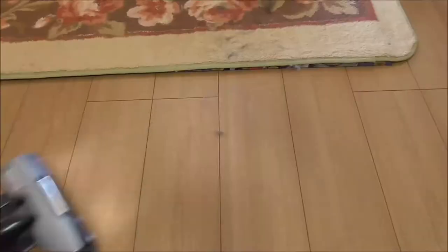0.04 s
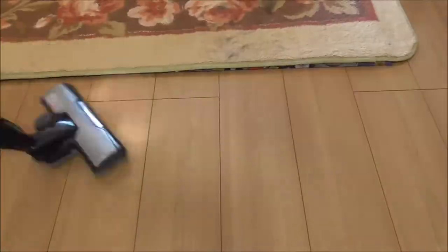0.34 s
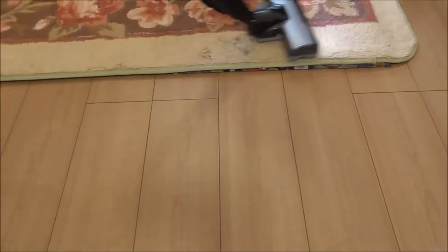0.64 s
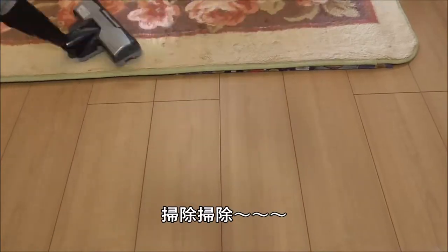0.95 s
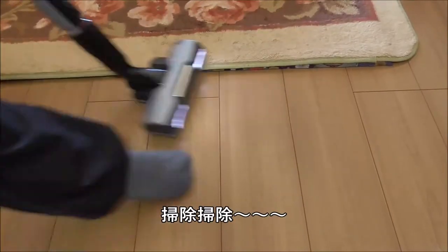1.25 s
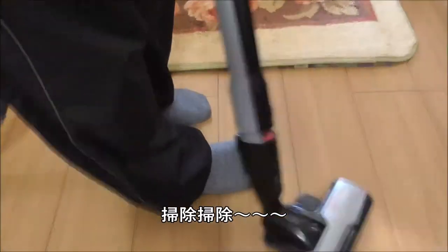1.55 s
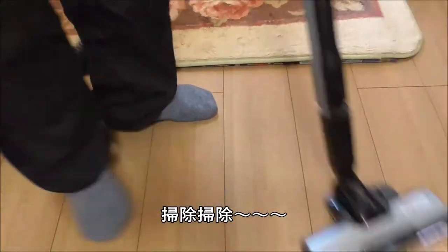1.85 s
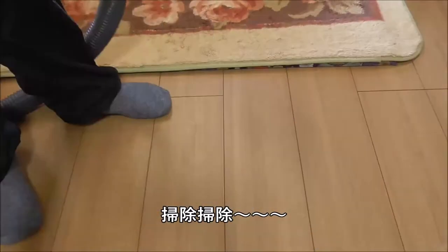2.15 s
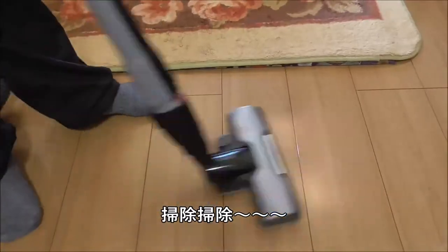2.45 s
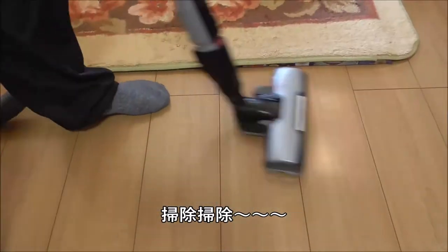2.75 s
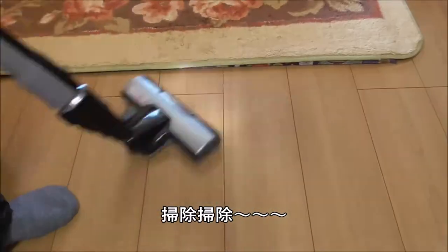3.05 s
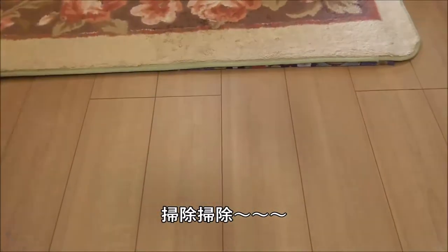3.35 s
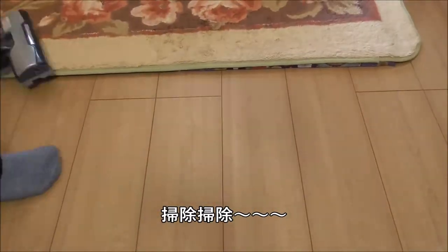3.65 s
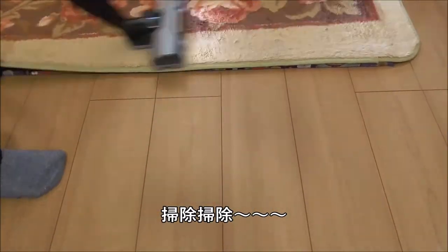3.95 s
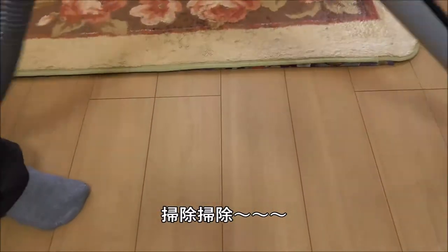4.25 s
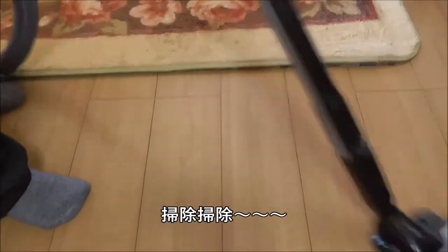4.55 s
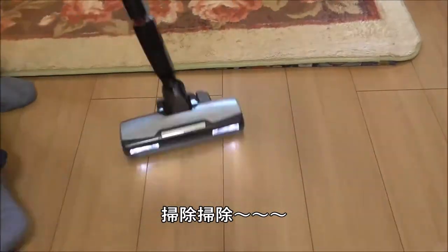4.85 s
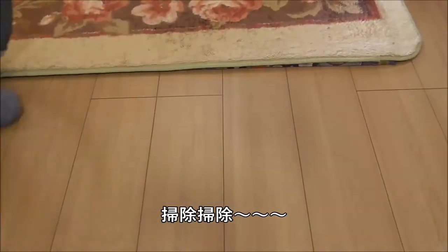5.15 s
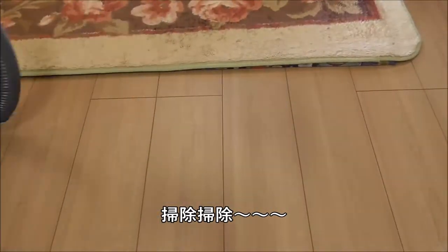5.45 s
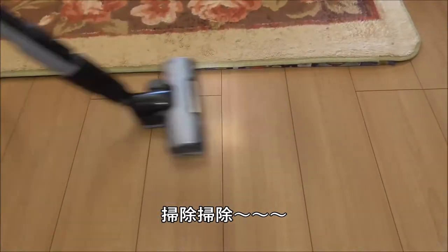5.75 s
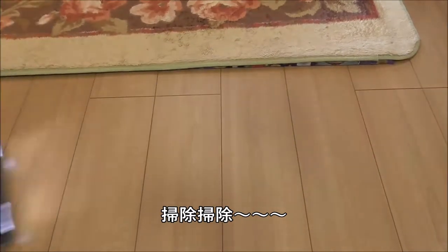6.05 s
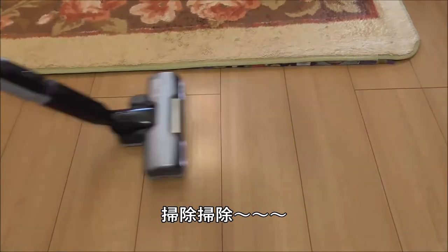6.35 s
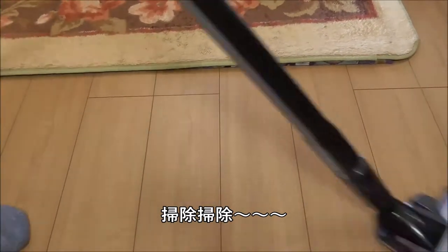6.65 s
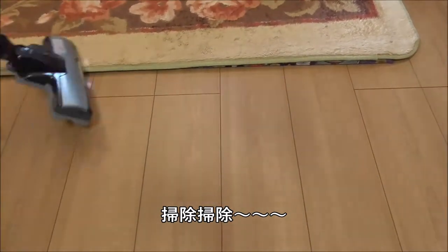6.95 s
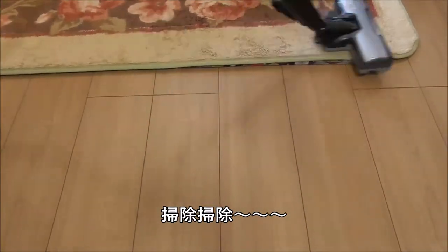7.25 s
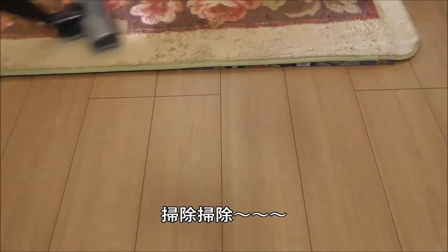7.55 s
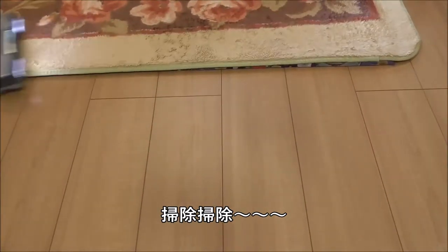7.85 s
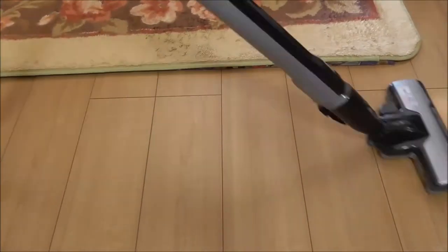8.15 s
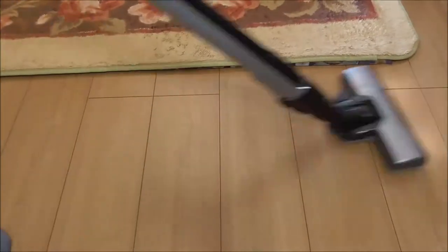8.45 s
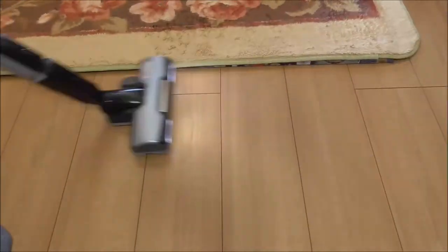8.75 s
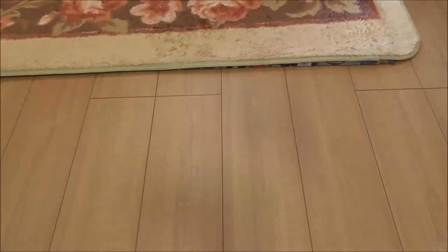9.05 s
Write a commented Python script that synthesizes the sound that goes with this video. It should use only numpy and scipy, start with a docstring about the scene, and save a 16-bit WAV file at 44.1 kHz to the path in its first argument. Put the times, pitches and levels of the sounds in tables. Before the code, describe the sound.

A canister vacuum cleaner cuts in abruptly right at the start, already running, close by in a small room. Its motor holds a steady hum and a high whine while air rushes through the tube and hisses at the nozzle. The plastic head moves to and fro over wooden boards, each stroke swelling the hiss and rolling rumble, with short scrapes, faint whistles and ticks of grit. Knocks come often in the first two seconds, with sharp snaps of the swivel joint at about 1 and 1.5 seconds, then scattered bumps around 2.4, 4.2, 5.6, 6.1 and from 7 to 8.3 seconds. A rug slightly muffles the hiss and rumble from 0.4 to 1.2, 3.6 to 4.1 and 7 to 8 seconds. At 9 seconds the motor is switched off: the hum stops, the whine falls and the air fades, with a few light taps.

```python
"""In a small room, a canister vacuum cleaner is pushed to and fro over a wooden floor and a rug's edge.
The motor hums and whines, and air rushes through the tube, hisses at the nozzle and whistles in gaps.
The plastic floor head rumbles, scrapes, knocks and sucks up grit, all close by. Strokes swell the hiss
and rumble; the rug muffles them. Near the end the motor is switched off and runs down."""
import sys
import numpy as np
from scipy import signal
from scipy.fft import rfft, irfft, next_fast_len
from scipy.io import wavfile
from scipy.ndimage import uniform_filter1d

SR = 44100
rng = np.random.default_rng(int(sys.argv[2]) if len(sys.argv) > 2 else 0)


def digitize_waveform(pressure):
    """Quantize a signal to 16-bit integers and store it at the path in sys.argv[1].

    Rows of a 2-D input are taken as channels; values are limited to [-1, 1].
    """
    field = np.atleast_2d(pressure).T
    bounded = np.clip(field, -1, 1)
    quanta = np.round(bounded * 32767).astype(np.int16)
    wavfile.write(sys.argv[1], SR, quanta)


N = 409688
T = np.arange(N) / SR
FFT_SIZE = next_fast_len(N + 8192)
FREQ = np.maximum(np.arange(FFT_SIZE // 2 + 1) * SR / FFT_SIZE, 1)
START_S, OFF_S = .0625, 9.01  # the running cleaner cuts in abruptly at START_S; switched off at OFF_S

# The tone colour of each noise. Each row: frequency in Hz, relative level in dB.
ROOM_COLOUR = [(30, -17), (120, -26), (230, -16.5), (500, -2), (1200, -1.5), (3000, -15), (8000, -11.5),
               (15000, -12.5)]
CRACK_COLOUR = [(150, -70), (1000, -35), (4000, -12), (6500, -1), (10000, -7), (16000, 3)]
GRIT_COLOUR = [(1000, -25), (4000, -7), (9000, -1), (16000, 3)]
TICK_COLOUR = [(100, -60), (300, -42), (700, -24), (1500, 0), (4000, 19), (6500, 1.5), (9000, 3),
               (16000, -23)]
RUSH_COLOUR = [(30, -31), (130, -24.5), (210, -27), (290, -17), (360, -15), (430, 2), (520, -29),
               (760, -4.5), (950, -1), (1600, 2), (2150, -4), (2700, 1), (3600, -8), (9000, -46)]
HISS_COLOUR = [(200, -61), (800, -57), (1800, 0.5), (2600, -2), (3400, 3.5), (4200, 1.5), (5400, -0.5),
               (6200, -14.5), (7100, -39), (13000, -41)]
SPRAY_COLOUR = [(300, -45), (3000, -16), (6000, 7), (7000, -1), (8200, 1), (9600, -2), (11000, -3.5),
                (13000, -3.5), (15800, -4.5)]
# How wide the sound spreads. Each row: frequency in Hz, gain of the side signal in dB.
STEREO_WIDTH = [(50, -19), (150, -8), (270, -14.5), (400, -17), (700, -13.5), (1290, -14), (2380, -7.5),
                (4400, -7), (8120, -7.5), (15000, -5)]

# The ways each part likes to ring. Each row: pitch in Hz, width in Hz, relative level in dB.
TUBE_MODES = [(921, 115, 4.5), (1035, 26, 2), (1223, 37, 7), (1345, 35, 5.5), (1540, 200, -1.5),
              (2000, 66, 3.5), (2280, 54, 4), (3040, 120, -11), (3717, 72, 7.5)]  # the air in the tube and hose
BOARD_MODES = [(263.6, 35.2, -1.5), (310.2, 24.3, 2)]  # the floorboards
SHELL_MODES = [(402, 33, -2.5), (567, 53.5, -1.5), (620.5, 106, -4), (691.3, 31.4, 1)]  # the head's shell as it rolls
CAVITY_MODES = [(387, 83, 0.5), (533, 180, 1.5), (662, 128, 6)]  # the head's hollow when bumped
COVER_MODES = [(970, 110, 3), (1410, 380, -1.5)]  # the head's cover when bumped
CLACK_MODES = [(1720, 93, 13), (2310, 710, 4.5), (3460, 1570, 3.5), (5060, 1300, -5)]  # the plastic when hit hard

# The motor's hum. Each row: time in seconds, level in dB.
HUM_LEVELS = [(0.08, -55.5), (0.43, -62), (1.39, -63.5), (1.49, -71), (1.54, -55), (4.67, -55.5),
              (4.81, -53), (5.68, -56), (6.3, -55), (6.35, -60), (8.04, -63), (8.14, -56.5), (8.83, -63.5),
              (8.98, -57.5)]
# The tones in the hum. Each row: multiple of the hum's pitch, relative level in dB.
HUM_HARMONICS = [(1, 0), (2, -14.5), (3, -14.5), (4, -12), (5, -13.5), (6, -19.5)]
# A motor whine near 2.6 kHz that drifts in pitch and level while the power is on.
# Each row: time in seconds, pitch in Hz, level in dB.
MOTOR_WHINE = [(.56, 2606, -65), (.66, 2626, -54), (1.22, 2650, -57.5), (1.3, 2640, -68), (1.8, 2656, -61),
               (2.2, 2670, -61), (2.7, 2646, -59), (2.76, 2640, -59), (3.15, 2634, -50.5), (3.5, 2625, -55),
               (3.73, 2670, -65), (3.92, 2645, -55.5), (4.25, 2637, -56), (4.7, 2633, -54.5),
               (5.65, 2626, -52.5), (6.05, 2634, -56.5), (6.25, 2641, -54), (6.55, 2641, -53.5),
               (6.95, 2647, -56), (7.08, 2665, -69), (7.62, 2685, -69), (7.79, 2640, -56),
               (7.84, 2655, -70), (7.89, 2650, -52.5), (8.0, 2660, -66), (8.2, 2655, -60),
               (8.3, 2654, -56.5), (8.45, 2640, -53.5), (8.82, 2642, -58), (9.0, 2650, -54)]
# Grit and joints tick. Each row: start in seconds, click level in dB, crack level in dB.
TICKS = [(0.4486, -48, -43), (0.497, -47.5, -53), (0.5544, -47, -47), (0.5647, -44, -55),
         (0.817, -46.5, -45), (0.929, -51, -52), (1.0322, -54, -52), (1.216, -48, -52), (1.236, -51, -58),
         (1.5286, -45, -49), (1.753, -48, -47), (2.436, -45, -54), (2.45, -49, -56), (3.5605, -53, -50),
         (3.701, -45, -45), (3.712, -53, -53), (3.721, -49, -51), (4.1486, -50, -53), (4.5236, -45, -48),
         (6.9726, -46, -53), (6.984, -52, -57), (7.085, -49, -48), (7.0904, -47, -50), (7.7765, -52, -57),
         (7.947, -49, -55), (9.1633, -59, -68), (9.1985, -51, -60), (9.205, -58, -64)]
# The wand's swivel joint snaps. Each row: start in seconds, pitch in Hz, level in dB.
SNAPS = [(0.986, 3570, -36.5), (1.534, 3500, -39), (1.562, 2700, -35), (1.579, 2600, -37.5),
         (1.606, 3250, -41)]
# The head bumps the floor and the rug's edge.
# Each row: start in seconds, then base levels in dB of the cavity, thud, cover and clack.
KNOCKS = [(0.298, -46.5, -70, -50, -48), (0.498, -49, -63, -41.5, -50), (0.558, -43, -47, -52, -48),
          (0.565, -63, -49, -59, -57), (0.74, -42.5, -68, -43.5, -52), (0.94, -53, -61, -44, -45.5),
          (0.953, -44, -59, -47, -53), (0.986, -60, -78, -39.5, -42), (1.162, -40, -57, -36.5, -48),
          (1.436, -45, -49, -54, -46), (1.528, -42.5, -57, -47, -41.5), (1.561, -57, -63, -47, -41),
          (1.578, -51, -58, -38, -36), (1.606, -42, -49, -46, -48), (1.616, -52, -71, -40.5, -53),
          (1.658, -46, -62, -46, -50), (1.7543, -42.5, -63, -45, -53), (1.906, -43, -68, -46, -45),
          (1.983, -54, -47, -53, -52), (2.4353, -43, -52, -40, -42), (3.724, -56, -52, -58, -50),
          (4.15, -46, -58, -45, -47), (4.175, -48, -52, -57, -54), (4.19, -44.5, -68, -60, -46),
          (4.524, -43, -63, -68, -52), (5.576, -53, -65, -40, -41), (5.671, -44, -59, -40.5, -50),
          (6.093, -46, -64, -37, -37.5), (6.821, -44, -62, -42.5, -53), (6.847, -47, -67, -55, -55),
          (7.084, -48.5, -52, -40.5, -45), (7.094, -56, -52, -55, -57), (7.344, -51.5, -71, -47, -60),
          (7.777, -46, -62, -38, -43), (7.798, -60, -76, -49, -47), (7.952, -51, -61, -59, -46.5),
          (8.152, -43.5, -48, -52, -45), (8.238, -41.5, -68, -35.5, -54), (8.625, -47, -69, -51, -56),
          (9.143, -63.5, -71, -59, -64), (9.268, -64, -74.5, -55, -66), (9.281, -62, -77, -54, -64)]
# The head's lip scrapes the boards. Each row: start and length in seconds, pitch in Hz, level in dB.
HOOTS = [(1.643, 0.036, 640, -51), (1.785, 0.055, 692, -52), (2.556, 0.048, 692, -49.5),
         (2.668, 0.072, 695, -50.5), (2.843, 0.059, 685, -51.5), (2.96, 0.048, 661, -51),
         (4.22, .075, 685, -50), (4.372, .06, 691, -54), (4.529, .06, 688, -50), (4.612, .064, 688, -45.5),
         (5.204, 0.072, 712, -51.5), (5.975, .07, 680, -49), (6.641, .07, 675, -52.5),
         (8.499, 0.057, 693, -51), (8.737, .06, 690, -57)]
# Air squeezes through gaps at the head.
# Each row: start and length in seconds, first and last pitch in Hz, level in dB.
GAP_WHISTLES = [(0.244, 0.072, 2080, 2060, -49.5), (1.316, 0.14, 2000, 2094, -51.5),
                (1.464, 0.117, 1343, 1424, -54), (2.056, 0.27, 1660, 1580, -58),
                (2.169, 0.16, 2190, 2140, -58), (2.308, .17, 1600, 1670, -59), (3.37, 0.1, 1510, 1540, -53),
                (4.219, .06, 2400, 2370, -53), (4.769, 0.4, 1375, 1335, -53.5),
                (4.93, 0.29, 1680, 1570, -57), (4.96, .17, 2413, 2400, -60), (5.04, .11, 2650, 2730, -55),
                (5.417, 0.11, 2290, 2310, -55.5), (5.5, .33, 2410, 2410, -59),
                (6.36, 0.36, 1351, 1377, -55.5), (6.67, .16, 2760, 2950, -57), (6.7, .14, 1400, 1483, -57),
                (8.032, 0.15, 2020, 2120, -56), (8.057, 0.1, 1020, 1044, -57),
                (8.28, 0.096, 1390, 1370, -55), (8.43, 0.052, 1880, 1870, -53),
                (8.46, 0.086, 2560, 2530, -54), (8.67, .12, 1490, 1410, -55),
                (8.781, 0.16, 1374, 1378, -55), (8.97, 0.058, 1200, 1160, -53)]
# Flare-ups of a very high, thin tone.
# Each row: start and length in seconds, first and last pitch in Hz, bend midway in Hz, level in dB.
THIN_TONE_FLARES = [(1.47, .14, 10300, 10200, 0, -68), (1.83, .22, 10280, 10400, 60, -73),
                    (2.28, .13, 10400, 10280, 60, -66), (2.63, 0.13, 10200, 10300, 0, -66),
                    (2.91, 0.12, 10220, 10350, 0, -66), (3.14, .19, 10170, 10300, 90, -65),
                    (3.35, .1, 10250, 9950, 0, -71), (3.829, .3, 10630, 10520, 0, -74),
                    (4.345, 0.063, 10450, 10120, 60, -65), (4.69, .11, 10150, 10220, 50, -65),
                    (5.07, .08, 10430, 10320, 0, -65), (5.13, .05, 10320, 10480, 0, -69),
                    (5.39, .16, 10220, 10290, 60, -70), (5.57, .16, 10230, 10280, 30, -72),
                    (5.88, .21, 10170, 10400, -50, -66), (6.13, .15, 10340, 10260, 0, -73),
                    (6.49, .1, 10300, 10330, 50, -67), (6.76, .11, 10180, 10200, 90, -66),
                    (7.29, .12, 10440, 10400, 30, -72), (8.235, 0.18, 10160, 10200, 100, -66),
                    (8.519, .19, 10130, 10190, 130, -69), (8.73, .08, 10230, 10380, 40, -69),
                    (8.85, 0.19, 10230, 10200, 90, -67)]
# Pushes and pulls of the head.
# Each row: middle and length in seconds, then rise of the hiss, shell rattle and floor rumble in dB.
STROKES = [(0.12, 0.65, 7, -54, -63.5), (0.364, 0.13, 4.5, -50.5, -59.5), (1.355, 0.18, 5.5, -65, -77),
           (1.642, 0.2, 4, -53, -66.5), (1.916, 0.27, 5, -53, -67), (2.087, 0.23, 3.5, -67, -65),
           (2.419, 0.071, 1.5, -57, -65), (2.545, 0.15, 5.5, -52.5, -64.5), (2.74, 0.24, 3, -65, -62),
           (2.85, .12, 3, -57, -66), (3.009, 0.22, 5, -57, -63.5), (3.215, 0.37, .5, -67, -68),
           (3.46, 0.23, -0.5, -64, -81), (3.63, 0.13, -2, -80, -90), (3.731, 0.097, 2, -58, -60),
           (4.233, 0.22, 7, -54, -63.5), (4.416, 0.2, 5, -55.5, -78), (4.638, 0.13, 4, -57, -63),
           (4.803, 0.27, 4, -55, -63), (4.983, 0.19, 3, -57.5, -67), (5.24, 0.22, 3.5, -64, -93),
           (5.564, 0.39, 2.5, -58.5, -75), (5.824, 0.2, 6, -57.5, -67), (6.026, 0.13, 5, -52, -67.5),
           (6.142, 0.17, 5, -53.5, -67), (6.279, 0.066, -0.5, -54, -70), (6.429, 0.18, 2.5, -65, -68),
           (6.663, 0.23, 3.5, -60, -64), (6.838, 0.19, 5, -50.5, -75), (7.399, 0.16, 2, -76, -88),
           (8.102, 0.31, 4, -64, -70), (8.313, 0.21, 5, -54.5, -70), (8.49, 0.19, 5, -58, -61),
           (8.771, 0.22, 4.5, -57, -71)]
# When the head is on the rug. Each row: start and end in seconds, share of the head on it from 0 to 1.
RUG_VISITS = [(.42, 1.25, 1), (3.57, 4.14, .85), (6.96, 8.0, .95)]
# The air rushing in the tube. Each row: time in seconds, base level in dB.
RUSH_LEVELS = [(.07, -45), (.25, -51), (1.12, -51), (1.6, -50.5), (2.3, -50), (2.8, -49.5), (3.15, -51),
               (3.45, -49.5), (4.0, -50.5), (4.4, -51.5), (5.0, -49), (5.95, -51), (6.16, -46.5),
               (6.4, -50), (7.3, -52), (8.4, -51), (8.9, -52.5)]


def undb(db):
    """Turn decibels into a gain."""
    return 10 ** (np.asarray(db) / 20)


def unit(x):
    """Scale a signal to an average (rms) level of 1."""
    return x / np.sqrt(np.mean(x ** 2))


def curves(table):
    """Join a table's rows with straight lines in time, one curve per column."""
    times, *columns = np.transpose(table)
    return [np.interp(T, times, column) for column in columns]


def colour(points):
    """A filter drawn through (Hz, dB) points."""
    hz, db = np.transpose(points)
    return undb(np.interp(np.log(FREQ), np.log(hz), db))


def resonance(hz, width):
    """A filter that rings at one pitch, with gain 1 there."""
    return 1 / (1 + 1j * (FREQ ** 2 - hz ** 2) / (FREQ * width))


def ring(modes):
    """A filter that rings at several pitches, added with alternating signs."""
    return sum((-1) ** k * undb(db) * resonance(hz, width) for k, (hz, width, db) in enumerate(modes))


def low_cut(hz, order):
    """A filter that removes bass, since small parts give off little of it."""
    return signal.freqs(*signal.butter(order, 1, "high", analog=True), FREQ / hz)[1]


def shape(x, response):
    """Pass a signal through a filter."""
    return irfft(rfft(x, FFT_SIZE) * response, FFT_SIZE)[..., :N]


def wander(per_second):
    """A smooth random curve, mostly between -1 and 1."""
    hold = max(int(SR / per_second), 1)
    steps = np.repeat(rng.standard_normal(N // hold + 1), hold)
    return 1.344 * uniform_filter1d(uniform_filter1d(steps, hold), hold)[:N]


def noise():
    """Two noises: one for the direct sound (mid), one for reflections (side)."""
    return rng.standard_normal((2, N))


def blows(times, levels_db, rattle_s, response, strike):
    """Each hit is a sharp strike and a dying chatter; its loudest 3 ms set its level."""
    count = 4096
    out = np.zeros((2, N + count))
    t = np.arange(count) / SR
    ringing = irfft(response, FFT_SIZE)[None, :count]
    for start, db in zip(*np.broadcast_arrays(times, levels_db)):
        chatter = rng.standard_normal((2, count)) * np.exp(-t / rattle_s)
        chatter[0, 0] += strike
        hit = signal.fftconvolve(chatter, ringing, axes=1)[:, :count]
        loudest = np.sqrt(uniform_filter1d(hit ** 2, 132).max(axis=1, keepdims=True))
        out[:, int(start * SR):int(start * SR) + count] += hit / loudest * undb(db)
    return out[:, :N]


def chirp(start, length, first_hz, last_hz, db, rough_hz, bend_hz=0):
    """A short gliding tone that swells and dies while its pitch shakes."""
    out, count = np.zeros((2, N)), int(length * SR)
    shake, drift = uniform_filter1d(rng.standard_normal((2, SR)), 220, axis=1)[:, :count] * np.sqrt(220)
    arch = np.sin(np.linspace(0, np.pi, count)).clip(0)
    hz = np.linspace(first_hz, last_hz, count) + bend_hz * arch + rough_hz * shake
    phase = 2 * np.pi * np.cumsum(hz) / SR
    swell = np.sqrt(2) * undb(db) * arch ** .6
    mid_side = np.array([np.sin(phase), .5 * np.sin(phase + drift)])
    out[:, int(start * SR):int(start * SR) + count] = swell * mid_side
    return out


def tone(hz, waver_db, side_db):
    """A lasting tone whose level and reflection waver as things move in the room."""
    phase = 2 * np.pi * np.cumsum(hz) / SR
    mid = np.sin(phase) * undb(waver_db * wander(12))
    side = undb(side_db) * np.sin(phase + 2 * wander(3))
    return np.sqrt(2) * np.array([mid, side])


def room_air():
    """The faint, steady noise of the room."""
    return unit(shape(noise(), colour(ROOM_COLOUR))) * undb(-66)


def room_echo(x, echo_db, fade_s):
    """Walls and furniture add a short tail that drops 60 dB in fade_s."""
    t = np.arange(SR // 2) / SR
    tail = rng.standard_normal((2, len(t))) * np.exp(-np.log(1000) * t / fade_s) * (t > .005)
    tail /= np.sqrt(np.sum(tail ** 2, axis=1, keepdims=True))
    return x + undb(echo_db) * signal.fftconvolve(x, tail, axes=1)[:, :N]


def grit(grains=26):
    """Fine grains tick faintly against the tube at random while the motor runs."""
    times = rng.uniform(START_S, OFF_S, size=grains)
    levels_db = rng.normal(-61, 6, size=grains)
    return blows(times, levels_db, rattle_s=.001, response=colour(GRIT_COLOUR), strike=6)


def ticks():
    """Grit flies up the tube and the joints click; hard grains add a short, bright crack."""
    times, click_db, crack_db = np.transpose(TICKS)
    clicks = blows(times, click_db, rattle_s=.0054, response=colour(TICK_COLOUR), strike=3.1)
    cracks = blows(times, crack_db, rattle_s=.0017, response=colour(CRACK_COLOUR), strike=3.2)
    return clicks + cracks


def snaps():
    """The swivel joint hits its stop and rings, at a pitch that depends on its angle."""
    return sum(blows([start], db, rattle_s=.003, response=resonance(hz, 420) * resonance(hz, 2600),
                     strike=5) for start, hz, db in SNAPS)


def knocks(rattle_s=.0021, strike=9):
    """Bumps ring the head's cavity and cover; heavy ones thud in the boards, hard ones clack."""
    times, cavity_db, thud_db, cover_db, clack_db = np.transpose(KNOCKS)
    hollow = ring(CAVITY_MODES) * low_cut(345, order=5) * resonance(490, 1200)
    cavity = blows(times, cavity_db + .5, rattle_s, hollow, strike)
    thud = blows(times, thud_db - 2.5, rattle_s, resonance(307, 47) * low_cut(255, order=4), strike)
    cover = blows(times, cover_db, rattle_s, ring(COVER_MODES) * low_cut(760, order=3), strike)
    clack = blows(times, clack_db + 2.5, rattle_s, ring(CLACK_MODES) * resonance(2500, 5900), strike / 2)
    return cavity + thud + cover + clack


def hoots():
    """The dragging lip catches and slips, so the hollow head gives a ragged hoot."""
    catches = unit(undb(4 * wander(170)))
    return catches * sum(chirp(start, length, hz, hz, db, rough_hz=48) for start, length, hz, db in HOOTS)


def thin_tone():
    """A very high, thin tone near 10.3 kHz flares up and flutters."""
    flutter = unit(undb(3 * wander(70)))
    return flutter * sum(chirp(start, length, first, last, db, rough_hz=58, bend_hz=bend)
                         for start, length, first, last, bend, db in THIN_TONE_FLARES)


def gap_whistles():
    """Gaps at the head whistle as they open and close; higher tones wander more."""
    return sum(chirp(start, length, first, last, db, rough_hz=.33 * np.sqrt(first))
               for start, length, first, last, db in GAP_WHISTLES)


def power():
    """The motor's power: 1, then falling quickly to 0 at switch-off."""
    return np.exp(-np.maximum(T - OFF_S, 0) / .0053)


def motor_speed(slowing_per_s=3.3):
    """The motor's speed: 1 until switch-off, then air drag slows it."""
    return 1 / (1 + slowing_per_s * np.maximum(T - OFF_S, 0))


def motor_hum(pitch_hz=400.7):
    """The motor hums with a stack of tones that stops with the power."""
    level_db, = curves(HUM_LEVELS)
    hz = pitch_hz * (1 + .0015 * wander(10))
    hum = sum(undb(db) * tone(k * hz, waver_db=.8 if k == 1 else 3, side_db=-16)
              for k, db in HUM_HARMONICS)
    return hum * undb(level_db) * power()


def motor_whine(housing_hz=1630, housing_width_hz=180):
    """A motor whines; without power it sinks and fades, swelling as it passes the housing's pitch."""
    powered_hz, level_db = curves(MOTOR_WHINE)
    wobble = .001 + .01 * (1 - power())
    hz = powered_hz * (1 + wobble * wander(90)) * motor_speed()
    whine = tone(hz, waver_db=1.5, side_db=-17)
    octave = undb(-25) * tone(2 * hz, waver_db=3.5, side_db=-8)
    near_housing = np.exp(-((hz - housing_hz) / housing_width_hz) ** 2)
    coasting = undb(-23 + 17 * near_housing + 2 * wander(80))
    return (whine + octave) * undb(level_db) * np.maximum(power(), coasting)


def strokes(sharpness=1.21):
    """The head speeds up and slows down in each stroke, and hiss, rattle and rumble follow."""
    rise_db = wander(14)  # the gap under the head keeps changing, and the hiss with it
    shell_gain, boards_gain = np.zeros((2, N))
    for middle, length, hiss_db, shell_db, boards_db in STROKES:
        during = np.abs(T - middle) < length / 2
        speed = np.cos(np.pi * (T[during] - middle) / length) ** sharpness
        rise_db[during] += speed * hiss_db
        shell_gain[during] += speed ** 2 * undb(shell_db)
        boards_gain[during] += speed ** 2 * undb(boards_db)
    return rise_db, shell_gain, boards_gain


def on_rug(crossing_s=.063):
    """How much of the head lies on the rug, from 0 to 1."""
    return sum(share * np.clip(np.minimum(T - start, end - T) / crossing_s + .5, 0, 1)
               for start, end, share in RUG_VISITS)


def rolling(shell_gain, boards_gain, rug):
    """Wheels and brush jolt over the floor, shake the shell and set boards and beams rumbling."""
    shell_filter = ring(SHELL_MODES) * low_cut(370, order=4)
    shell_filter *= colour([(750, -27.5), (1100, -7), (3000, -25)])
    board_filter = ring(BOARD_MODES) * low_cut(259, order=8) * colour([(340, -18.5), (600, 8)])
    beam_filter = colour([(25, -8), (45, -5), (110, -6), (170, -3), (240, 0), (500, -34)])
    shell = unit(shape(noise() * undb(2.4 * wander(70)), shell_filter))
    jolts = noise() * undb(2.6 * wander(50))
    floor = unit(shape(jolts, board_filter)) + undb(-20) * unit(shape(jolts, beam_filter))
    idle = undb(-7.5 * rug + 2.8 * wander(10)) * motor_speed() ** 4  # shaking even between strokes
    return shell * (shell_gain + idle * undb(-64)) + floor * (boards_gain + idle * undb(-75.5))


def floor_bounce(x, lag_ms, swing):
    """The floor sends back a weak copy whose delay wanders as the wand moves; it sounds hollow."""
    samples = np.arange(N)
    lag = lag_ms * SR / 1000 * np.exp(swing * wander(2))
    return x + .33 * np.array([np.interp(samples - lag, samples, channel) for channel in x])


def tube_rush():
    """Rushing air rings the tube; each pitch swells and fades as the seal to the floor changes."""
    plain = colour(RUSH_COLOUR)
    eddies = shape(noise(), plain)
    ringing = sum(shape(eddies, resonance(hz, width)) * undb(db + 1.9 * wander(7))
                  for hz, width, db in TUBE_MODES)
    rush = unit(floor_bounce(shape(noise(), plain) + ringing, lag_ms=5.5, swing=.14))
    coasting = undb(-1.5) * shape(rush, low_cut(720, order=5))  # softer and thinner without power
    return power() * rush + (1 - power()) * coasting


def suction(rise_db, rug):
    """Air rushes in the tube, hisses under the head and ends in a fine, gritty spray."""
    rush_db, = curves(RUSH_LEVELS)
    rush = tube_rush()
    hiss = shape(noise() * undb(1.2 * wander(16)), colour(HISS_COLOUR))
    hiss = unit(floor_bounce(hiss, lag_ms=3, swing=.1))
    spray = unit(shape(noise() * undb(1.3 * wander(600) + 1.16 * wander(25)), colour(SPRAY_COLOUR)))
    # Strokes swell each layer, the rug muffles it, and it dies as the motor slows, the brightest first.
    speed = motor_speed()
    rush *= undb(rush_db + .38 * rise_db - 1.5 * rug) * speed ** 2
    hiss *= undb(-54.5 + rise_db - 2 * rug) * speed ** 2.7
    spray *= undb(-60 + .98 * rise_db - 5 * rug) * speed ** 12
    flutter = undb(.5 * wander(35))
    return flutter * (rush + hiss + spray)


def scene():
    """Mix everything into left and right; the hum stays central and the treble spreads."""
    rise_db, shell_gain, boards_gain = strokes()
    rug = on_rug()
    air = suction(rise_db, rug)
    air[1] += .079 * wander(1.8) * air[0]  # sways left and right with the wand
    head = rolling(shell_gain, boards_gain, rug) + gap_whistles() + thin_tone() + hoots()
    cut_in = np.clip((T - START_S) / .00023, 0, 1)
    cleaner = (air + head + motor_hum() + motor_whine()) * cut_in
    background = room_air()
    hits = room_echo(knocks() + snaps() + ticks() + grit(), echo_db=-5.5, fade_s=.054)
    mid, side = background + hits + cleaner
    side = shape(side, colour(STEREO_WIDTH))
    return np.array([mid + side, mid - side])


def record(dry):
    """Cut away the very highest treble."""
    top_hz = 15900
    return signal.sosfilt(signal.ellip(10, .2, 70, top_hz, fs=SR, output="sos"), dry)


dry = scene()
out = record(dry)
digitize_waveform(out)
```